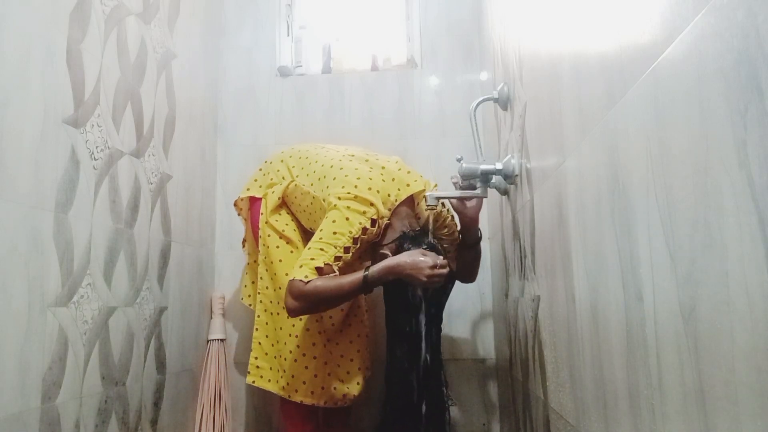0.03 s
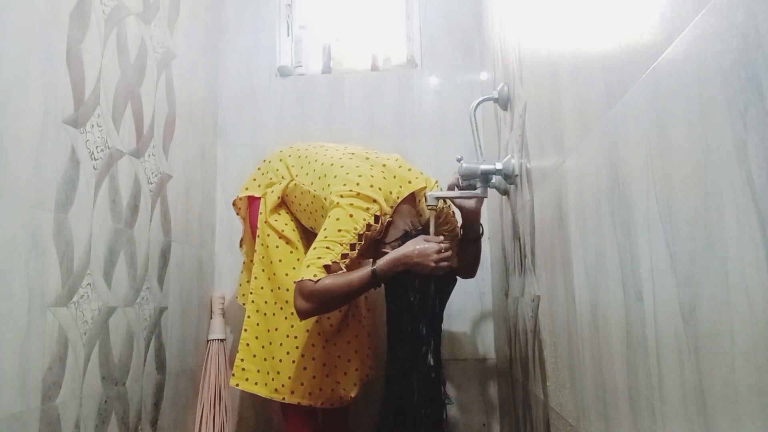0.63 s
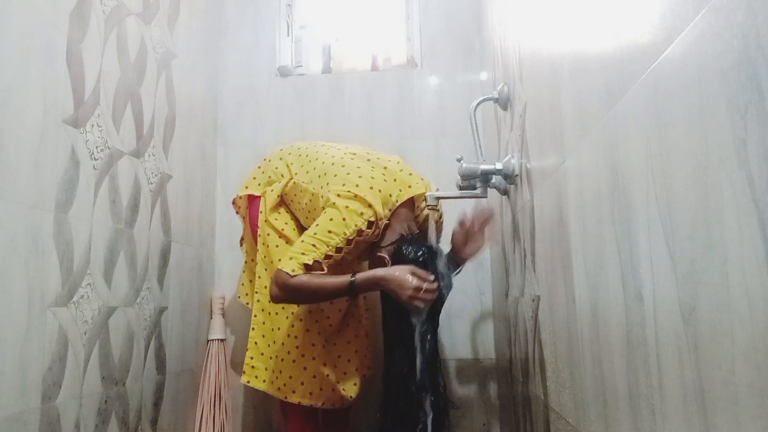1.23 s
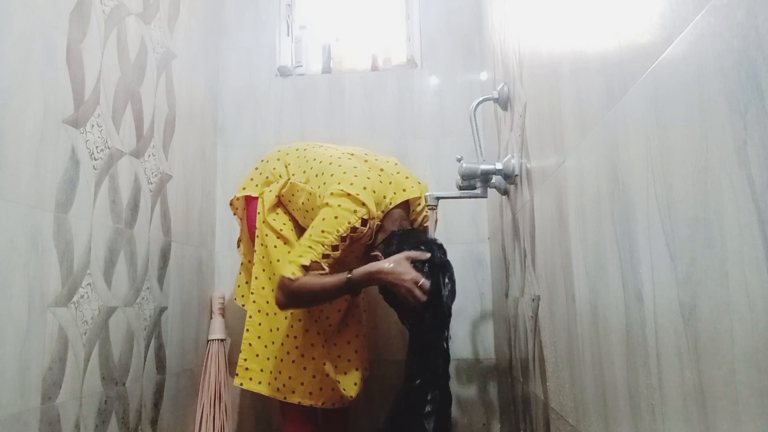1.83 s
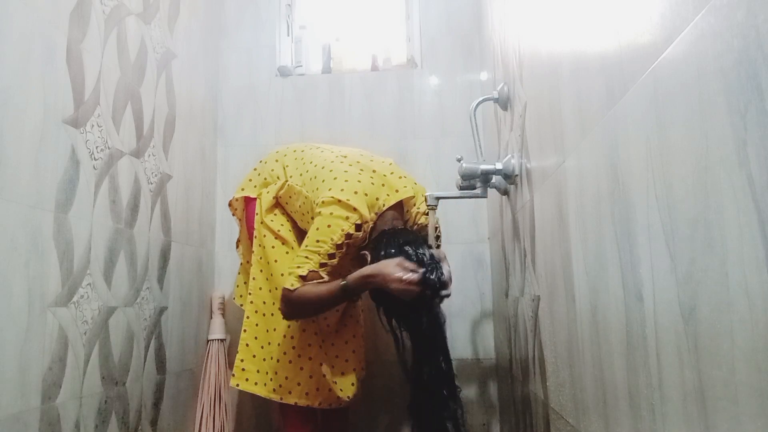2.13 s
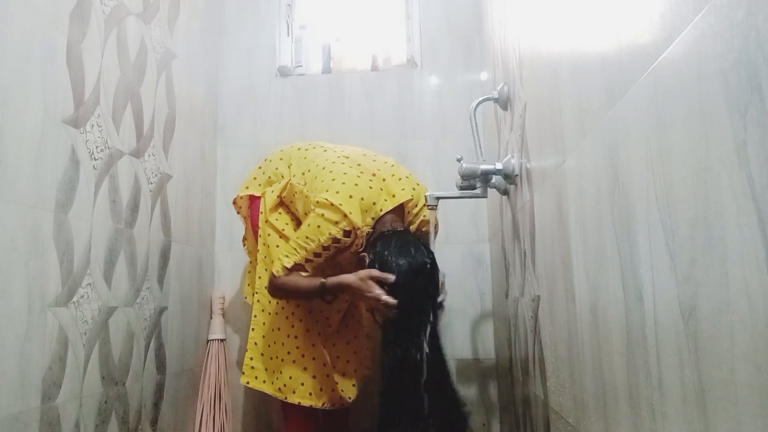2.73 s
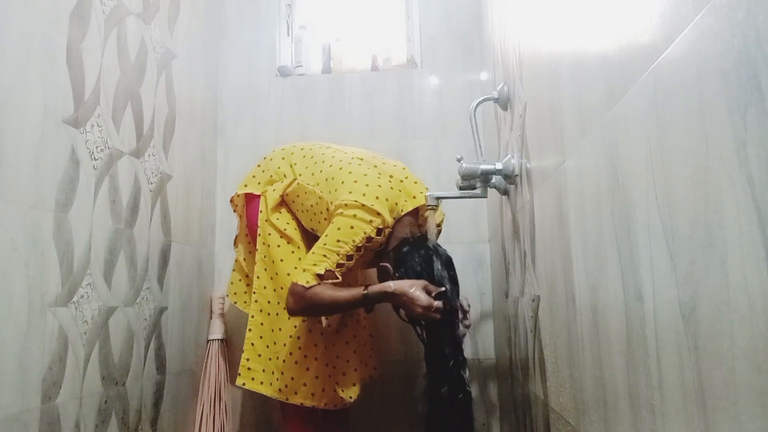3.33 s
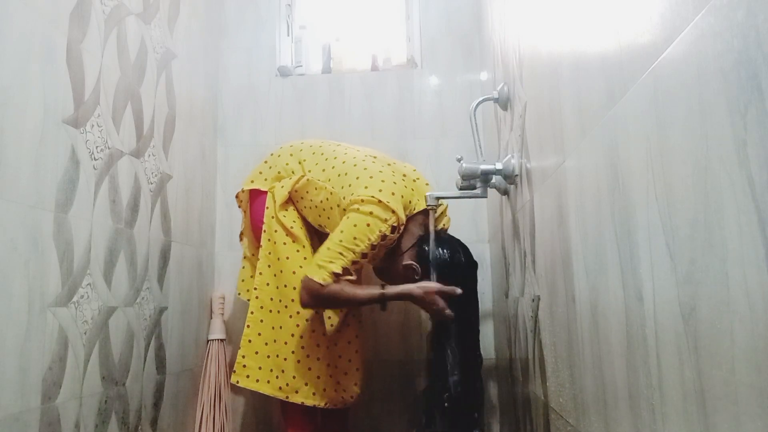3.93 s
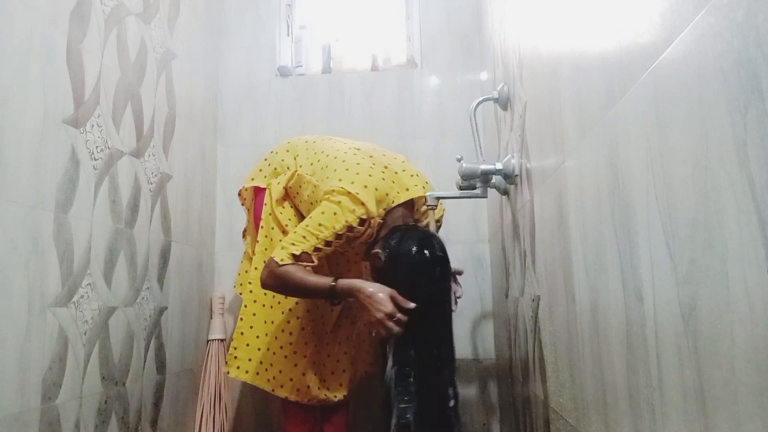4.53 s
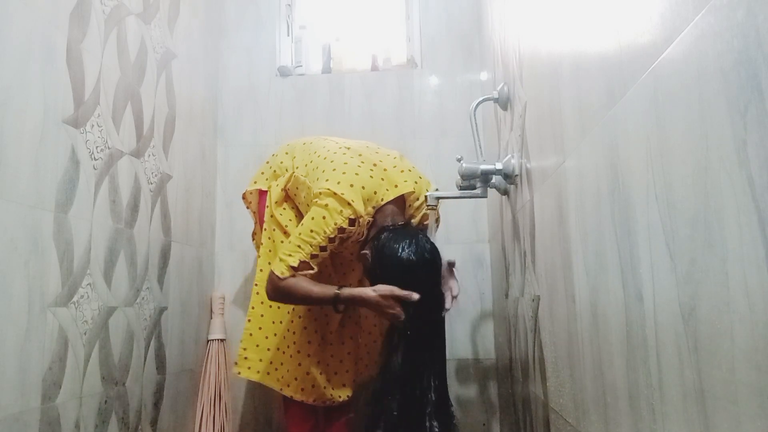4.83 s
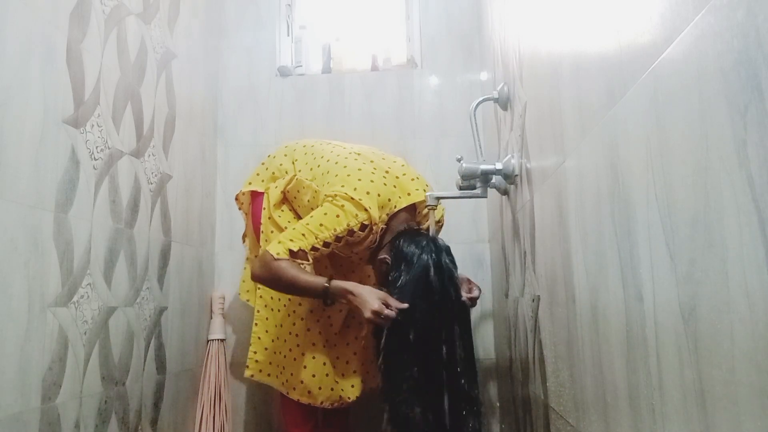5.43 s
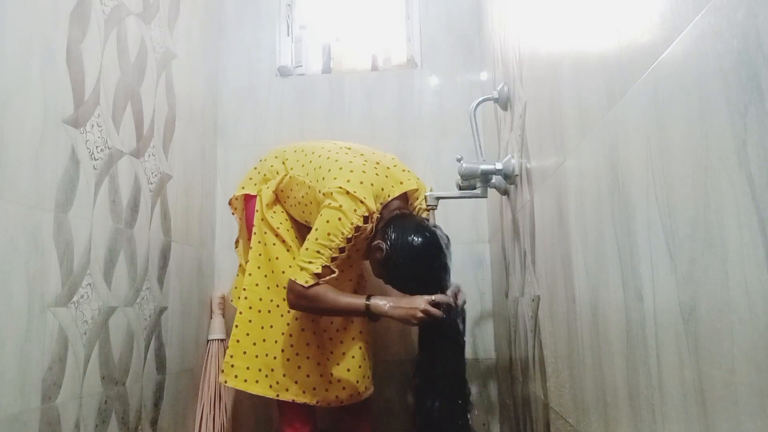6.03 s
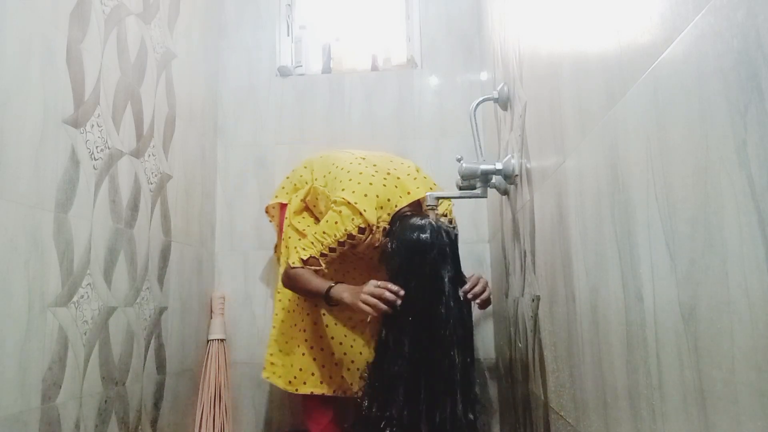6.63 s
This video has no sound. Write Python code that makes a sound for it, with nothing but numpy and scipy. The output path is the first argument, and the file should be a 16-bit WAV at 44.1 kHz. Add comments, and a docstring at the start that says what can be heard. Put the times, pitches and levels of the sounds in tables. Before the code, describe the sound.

Tap water runs through long hair and splatters unevenly onto the floor of a small, echoing tiled bathroom.

```python
"""Tap water runs through long hair onto the floor of a small, echoing tiled bathroom.
Within half a second the stream builds: a gush drums, the puddle churns, hollow tones start ringing.
Then fine spray and heavier drops patter as the hands press out pour after pour; lumps of water slap
down, droplets spit, bubbles plop. The trickle surges near 4.2 s, eases, and swells again toward
the end at 6.7 s, with the hardest slaps."""
import sys
import numpy as np
from scipy import signal
from scipy.fft import rfft, irfft, next_fast_len
from scipy.io import wavfile
from scipy.ndimage import uniform_filter1d, map_coordinates

SR = 44100
rng = np.random.default_rng(int(sys.argv[2]) if len(sys.argv) > 2 else 0)


def unload_wav(signal):
    """Save mono or channel-first audio to the path in sys.argv[1] as 16-bit WAV at rate SR, clipped to [-1, 1]."""
    wavfile.write(
        sys.argv[1],
        SR,
        np.round(np.clip(np.atleast_2d(signal).T, -1, 1) * 32767).astype(np.int16),
    )


N = 295470

# tile reverberation: f/Hz, t60/s
TILE_DECAY = [(200, 0.26), (1300, 0.4), (3500, 0.36), (9000, 0.27), (15000, 0.22)]
# low standing waves of the room: f/Hz, width/Hz, level/dB
STANDING_WAVES = [(181.7, 16, 9), (276, 14.4, 8.5)]
# narrow resonances between the walls: f/Hz
WALL_TONES_HZ = [1045, 1284, 1775, 2124, 2357, 2860, 3153]
# still air: f/Hz, level/dB
AIR_SPECTRUM = [(20, -19), (100, 10.5), (1000, -4.5), (16000, -17)]
# churning of the puddle: t/s, level/dB
GURGLE_LEVEL = [(0.2, -100), (0.45, -65), (0.95, -92), (1.65, -65.5), (2.45, -82.5), (5.6, -85.5),
                (6.7, -78)]
# hollow resonances fed by the stream: f/Hz, nominal width/Hz, level/dB
HOLLOW_MODES = [(607.6, 22.5, 0), (998, 33, -8.5), (1441, 27, -1.5), (1887, 55, -9), (3026, 87, -7)]
# hollow ringing: t/s, level/dB
HOLLOW_LEVEL = [(0.15, -100), (0.26, -70), (0.6, -73.5), (1.5, -59.5), (2.2, -65), (3.1, -65.5), (3.7, -68),
                (5.5, -69), (6.7, -60)]
# second hollow tone, raised while the tap opens: t/s, gain/dB
SECOND_TONE_BOOST = [(0.3, 15), (0.95, 16.5), (1.5, 0.5)]
# drumming on the floor: f/Hz, level/dB
THUD_SPECTRUM = [(30, -54), (60, -34), (120, -9), (160, -13.5), (210, -2.5), (330, -10.5), (420, -6),
                 (520, 1), (750, -7.5), (1100, -2.5), (1800, -69.5)]
# thick gushes: crest t/s, level/dB, rise/(dB/s)
GUSH_CRESTS = [(0.498, -50.5, 212), (1.171, -60.5, 600), (1.65, -62.5, 78), (3.34, -76, 170),
               (6.071, -61.5, 902), (6.411, -67, 169.5)]
# large bubbles in the puddle: t/s, level/dB, f/Hz
PLOP_EVENTS = [(0.01, -55, 1106), (0.214, -62, 2534), (0.711, -52.5, 1172), (1.066, -52, 984),
               (1.169, -55.5, 312), (1.643, -49, 1255), (2.043, -49, 1235), (3.214, -53, 1234),
               (4.011, -53.5, 1127), (4.133, -50, 1230), (4.685, -62, 1270), (6.065, -56.5, 358),
               (6.072, -51.5, 572), (6.295, -47, 1184)]
# droplets bursting on the tiles: t/s, level/dB, f/Hz
SPIT_EVENTS = [(0.1014, -61.5, 7940), (0.4516, -53, 11100), (1.277, -48.5, 12800), (1.517, -53, 7810),
               (1.6452, -42.5, 6360), (1.68, -40.5, 10500), (1.759, -41, 7500), (1.877, -36, 10400),
               (1.8877, -37, 10100), (2.1188, -41.5, 7240), (3.1588, -49, 9500), (3.1965, -48, 12400),
               (3.3326, -54, 10700), (3.6243, -52, 10400), (3.6714, -44.5, 6940), (3.8692, -36.5, 11600),
               (4.165, -38, 10200), (4.357, -43.5, 10700), (4.463, -49.5, 10400), (4.636, -49, 8300),
               (5.183, -42.5, 6250), (5.578, -46, 8900), (5.701, -39.5, 6540), (6.04, -39.5, 7300),
               (6.4765, -43, 7850), (6.54, -35, 9660), (6.631, -40, 8100)]
# lumps of water landing: t/s, level/dB, f/Hz, width/oct
SLAP_EVENTS = [(0.3036, -52.5, 2380, 0.38), (0.4615, -40.5, 1760, 0.28), (0.4778, -39, 1940, 0.28),
               (0.4985, -38, 2030, 0.28), (0.61, -48.5, 2810, 0.3), (0.712, -46.5, 1900, 0.37),
               (0.852, -45, 2100, 0.42), (1.152, -41.5, 1250, 0.67), (1.1639, -35.5, 1820, 0.3),
               (1.427, -41.5, 2900, 0.87), (1.7695, -36.5, 2240, 0.46), (2.1173, -44.5, 2930, 0.6),
               (2.3995, -45.5, 2630, 0.54), (2.765, -51, 1650, 0.48), (3.1584, -47, 3800, 0.6),
               (3.3214, -47.5, 2480, 0.17), (3.8651, -42, 2980, 0.21), (3.887, -41.5, 3320, 0.8),
               (3.9445, -44, 2860, 0.17), (3.9686, -34.5, 3370, 0.74), (4.1415, -41.5, 1560, 0.7),
               (4.4628, -47.5, 2750, 0.23), (4.8628, -49, 3000, 0.18), (5.0394, -46.5, 1790, 0.57),
               (5.1846, -48, 3320, 0.7), (5.6835, -51, 3300, 0.5), (5.7, -43.5, 2880, 0.98),
               (5.937, -29.5, 1820, 0.29), (5.947, -39, 3310, 0.36), (6.289, -42.5, 2230, 0.66),
               (6.3314, -36, 2050, 0.68), (6.4737, -30, 3140, 0.34), (6.6467, -31.5, 2610, 0.79)]
# colour of the lumps: f/Hz, level/dB
SLAP_SPECTRUM = [(500, 5.0), (1300, -18.5), (4100, -12.5), (4800, -24.0), (7000, 0.5), (15000, -51)]
# fine spray: f/Hz, level/dB
SPRAY_SPECTRUM = [(2760, -28), (4700, -20.5), (4870, -31), (5120, -15.5), (5640, -10.5), (6740, -3.5),
                  (7770, -2.5), (9230, -11), (9860, -4), (10300, 2), (11500, -5), (12800, -2),
                  (14000, -12.5), (15000, -6.5)]
# heavy drops: f/Hz, level/dB
DROP_SPECTRUM = [(380, -30), (650, -2), (817, -2.5), (984, -4), (1360, -4.5), (3000, -4), (3900, 1.5),
                 (4900, -24), (6370, -76)]
# trickle off the hair: t/s, spray level/dB, drop level/dB
TRICKLE_LEVELS = [(0.0, -81.5, -71.5), (0.25, -79.5, -81), (0.42, -64.5, -60), (1.15, -66, -63),
                  (2.38, -68, -65), (2.7, -66, -64.5), (3.3, -62.5, -62.5), (3.75, -60.5, -73.5),
                  (4.2, -50.5, -53), (4.42, -64.5, -78), (5.0, -57, -72), (5.55, -58.5, -74),
                  (5.85, -53.5, -62.5), (6.7, -48, -50.5)]
# one pour per hand stroke: t/s, length/s, spray level/dB, drop level/dB, drop f/Hz
HAND_POURS = [(0.394, 0.15, -59.5, -51, 1640), (0.85, 0.17, -57.5, -53, 2420),
              (1.183, 0.065, -57.5, -56, 1380), (1.41, 0.19, -55.5, -54.5, 1920),
              (1.616, 0.17, -46.5, -49, 1860), (1.862, 0.035, -47, -51, 2600),
              (2.074, 0.15, -56.5, -56, 1740), (2.398, 0.12, -61.5, -56.5, 1860),
              (2.8, 0.13, -54.5, -53, 1430), (3.176, 0.16, -58.5, -63.5, 2800),
              (3.862, 0.12, -48, -53.5, 2320), (4.066, 0.23, -61, -55, 1660),
              (4.47, 0.076, -59.5, -57.5, 2520), (4.69, 0.13, -57, -63.5, 1800),
              (4.814, 0.17, -65, -58, 2080), (5.185, 0.13, -65, -62.5, 2400),
              (5.676, 0.11, -51.5, -55, 2930), (5.958, 0.16, -51.5, -57.5, 2440),
              (6.268, 0.091, -50.5, -47.5, 2060), (6.487, 0.32, -48, -47, 2220)]


def amp(db):
    """Decibels to gain."""
    return np.exp(np.asarray(db) * (np.log(10) / 20))


def unit(x):
    """Scale to rms 1."""
    return x / np.sqrt(np.mean(x ** 2) + 1e-20)


def along(points, hz):
    """Interpolate (f/Hz, value) points on a log axis."""
    f, v = np.transpose(points)
    return np.interp(np.log(hz + 1), np.log(f + 1), v)


def curves(rows):
    """One value per sample for each column after the time."""
    times, *columns = np.transpose(rows)
    return [np.interp(np.arange(N) / SR, times, column) for column in columns]


def wobble(rate_hz):
    """Smooth random curve, knots at rate_hz."""
    knots = rng.standard_normal(int(N * rate_hz / SR) + 4)
    return map_coordinates(knots, [np.arange(N) * rate_hz / SR])


def hump(hz, pitch_hz, width_oct):
    """Gain of a broad peak around a pitch."""
    return 1 / (1 + (np.log2((hz + 1) / pitch_hz) / width_oct) ** 2)


def resonances(modes, hz):
    """Gain of a set of modes: f/Hz, width/Hz, level/dB."""
    return np.sqrt(sum((amp(db) * width * hz) ** 2 / ((f * f - hz * hz) ** 2 + (width * hz) ** 2)
                       for f, width, db in modes))


def filtered(x, gain):
    """Minimum-phase filter with magnitude gain(hz)."""
    m = 2 * next_fast_len(len(x) // 2 + 4096)
    cepstrum = irfft(np.log(np.maximum(gain(np.fft.rfftfreq(m, 1 / SR)), 1e-6)), m)
    cepstrum[1:m // 2] *= 2
    cepstrum[m // 2 + 1:] = 0
    return irfft(rfft(x, m) * np.exp(rfft(cepstrum)), m)[:len(x)]


def add(track, start_s, sound):
    """Mix a sound into the track."""
    part = track[max(round(start_s * SR), 0):][:len(sound)]
    part += sound[:len(part)]


def impacts(samples, rate_hz, spread_db):
    """Randomly timed impulses of unequal size."""
    hit = rng.random(samples) < rate_hz / SR
    size = amp(spread_db * np.minimum(rng.exponential(size=samples), 4))
    return hit * size * np.sign(rng.standard_normal(samples))


def bubbles(count, pitch_hz, spread_oct, decay_cycles, spread_db, samples=441):
    """Scattered bubbles, each ringing briefly with rising pitch."""
    t = np.arange(samples) / SR
    start, strength = rng.random((count, 2)).T
    hz = np.minimum(pitch_hz * 2 ** (spread_oct * rng.standard_normal((count, 1))), SR / 3)
    age = hz * t / decay_cycles
    envelope = np.sqrt(hz) * np.exp(-age)  # equal energy at any pitch
    rings = envelope * np.sin(2 * np.pi * hz * t * (1 + 0.017 * age))
    gain = amp(spread_db * np.minimum(-np.log(strength), 3))
    where = (start * N).astype(int)[:, None] + np.arange(samples)
    return unit(np.bincount(where.ravel(), (gain[:, None] * rings).ravel(), N)[:N])


def bathroom(x, wet_db, early_db):
    """Direct sound, eight wall echoes and a diffuse tail, new on each call."""
    hz, t, noise = signal.stft(rng.standard_normal(SR // 2), SR, nperseg=256)
    tail = signal.istft(noise * amp(-60 * t / along(TILE_DECAY, hz)[:, None]), SR, nperseg=256)[1]
    response = amp(wet_db) * tail / np.linalg.norm(tail)
    delay_s = rng.uniform(.002, 0.02, size=8)
    response[(delay_s * SR).astype(int)] += amp(early_db) * rng.uniform(-0.83, 1, size=8)
    response[0] += 1
    return signal.fftconvolve(x, response)[:len(x)]


def spots(source, wet_db, count):
    """Water lands at several places, each with its own echoes."""
    return sum(bathroom(source(), wet_db, early_db=-1.5) for _ in range(count))


def still_air():
    """Faint, mostly low room noise."""
    return amp(-88.0) * unit(filtered(rng.standard_normal(N), lambda hz: amp(along(AIR_SPECTRUM, hz))))


def gurgle():
    """The stream churns the puddle; big soft bubbles wake the standing waves."""
    level_db, = curves(GURGLE_LEVEL)
    churn = bubbles(500, pitch_hz=475, spread_oct=0.751, decay_cycles=5.8, spread_db=4.5, samples=4000)
    wet = bathroom(churn, wet_db=5.5, early_db=0.0)
    return amp(level_db) * unit(filtered(wet, lambda hz: 1 + resonances(STANDING_WAVES, hz)))


def hollow_tones(wander_db=2.0, waver=0.012):
    """Drops keep hollow tones ringing, each drifting in level and pitch."""
    level_db, = curves(HOLLOW_LEVEL)
    tones = []
    for pitch_hz, width_hz, db in HOLLOW_MODES:
        hits = impacts(N, rate_hz=500, spread_db=3.0)
        ring = filtered(hits, lambda hz: resonances([(pitch_hz, width_hz, 0)], hz) ** 1.28)
        ring = map_coordinates(ring, [np.cumsum(1 + waver * wobble(24))], mode="mirror")
        tones.append(amp(db + wander_db * wobble(6.3)) * unit(ring))
    rms = np.std(sum(tones))
    tones[1] *= amp(curves(SECOND_TONE_BOOST)[0])
    return amp(level_db) * sum(tones) / rms


def gush_level_db(drops_db):
    """Light drumming follows the heavy drops; each gush crests and drains."""
    t = np.arange(N) / SR
    power = amp(-89.5 + drops_db - drops_db.mean()) ** 2
    for crest_s, db, rise_db_per_s in GUSH_CRESTS:
        drain_db_per_s = min(125, rise_db_per_s / 2)  # slow gushes ebb slowly
        below_db = np.maximum(rise_db_per_s * (crest_s - t), drain_db_per_s * (t - crest_s))
        power += amp(db - below_db) ** 2
    return 10 * np.log10(power)


def gushes(level_db):
    """Thick ropes of water drum on the floor and wake the standing waves."""
    blows = bathroom(impacts(N, rate_hz=300, spread_db=1.0), wet_db=4.5, early_db=-3.5)
    colour = lambda hz: amp(along(THUD_SPECTRUM, hz)) * (1 + resonances(STANDING_WAVES, hz))
    return amp(level_db + 1.0) * unit(filtered(blows, colour))


def plops(rise=0.12, attack_s=0.014, decay_s=0.0093, trim_db=-1):
    """A large bubble swells, rises in pitch and dies; two smaller ones follow."""
    gap_s, loss_db, pitch_step = 0.055, 5.5, 0.025  # per follower
    out, t = np.zeros(N), np.arange(SR // 2) / SR
    decay = np.exp(-t / decay_s)
    envelope = (1 - np.exp(-t / attack_s)) * decay
    for start_s, db, pitch_hz in PLOP_EVENTS:
        for k in range(3):
            glide_hz = pitch_hz * (1 + k * pitch_step + rise * (.3 - decay))
            note = envelope * np.sin(2 * np.pi * np.cumsum(glide_hz) / SR)
            wet = bathroom(note, wet_db=4.5, early_db=1.0)
            peak = amp(db + trim_db - k * loss_db) * np.sqrt(2)
            add(out, start_s + k * gap_s, peak * wet / np.abs(wet).max())
    return out


def splashes(rows, spectrum, t30_s, scatter, wet_db, trim_db):
    """A first blow and a dying cluster of fragments; four trapped bubbles ring near its pitch."""
    out, t = np.zeros(N), np.arange(SR // 3) / SR
    bubble_width_hz, bubble_db = 80, -4.0
    for start_s, db, pitch_hz, width_oct in rows:
        fragments = impacts(len(t), rate_hz=2500, spread_db=2.0) * amp(-30 * t / t30_s)
        burst = scatter * fragments / (np.linalg.norm(fragments) + 1e-9)
        burst[0] += 1
        trapped = [(pitch_hz * 2 ** (width_oct * offset), bubble_width_hz, bubble_db)
                   for offset in rng.uniform(-0.994, 1, size=4)]

        def colour(hz):
            band = hump(hz, pitch_hz, np.sqrt(2) * width_oct) ** 2
            low_cut = 1 / np.sqrt(1 + (pitch_hz * 2 ** (-1.7 * width_oct) / (hz + 1)) ** 12)
            return amp(along(spectrum, hz)) * band * low_cut * (1 + resonances(trapped, hz))

        wet = bathroom(filtered(burst, colour), wet_db, early_db=-13.0)
        peak_rms = np.sqrt(uniform_filter1d(wet ** 2, size=440).max())
        add(out, start_s, amp(db + trim_db) * wet / peak_rms)
    return out


def spits():
    """Droplets burst on the tiles; finer ones cover a wider band."""
    rows = [(start_s, db, hz, 0.43 * (hz / 7000) ** 2) for start_s, db, hz in SPIT_EVENTS]
    return splashes(rows, SPRAY_SPECTRUM, t30_s=0.0056, scatter=1.16, wet_db=5.5, trim_db=-1.5)


def slaps():
    """Squeezed-out lumps of water hit the floor."""
    return splashes(SLAP_EVENTS, SLAP_SPECTRUM, t30_s=0.011, scatter=1.36, wet_db=3.5, trim_db=-5.5)


def pour_shape(t, start_s, length_s, attack_s=0.023, swell_db=5, drain_db_per_s=105):
    """Gain of a pour that opens, swells while pressed and drains."""
    age_s = t - start_s
    opening = np.clip(age_s / attack_s, 0, 1)
    pressed_db = swell_db * (np.clip(age_s / length_s, 0, 1) - .5)
    return opening * amp(pressed_db - drain_db_per_s * np.maximum(age_s - length_s, 0))


def flow_db():
    """Levels of spray and drops: trickle plus pours."""
    t = np.arange(N) / SR
    power = amp(curves(TRICKLE_LEVELS)) ** 2
    for start_s, length_s, spray_db, drops_db, _ in HAND_POURS:
        power += (amp([[spray_db], [drops_db]]) * pour_shape(t, start_s, length_s)) ** 2
    return 10 * np.log10(power)


def spray(level_db):
    """Fine droplets tick on the wet floor in flurries and leave a fizz of tiny bubbles."""
    def droplets():
        flurries = amp(1.8 * wobble(30))
        ticks = unit(impacts(N, rate_hz=95, spread_db=3.7))
        fizz = bubbles(1200, pitch_hz=9160, spread_oct=0.425, decay_cycles=8.3, spread_db=3.0)
        return flurries * (ticks + 0.18 * fizz)

    wet = spots(droplets, wet_db=4.5, count=3)
    return amp(level_db - 0.02) * unit(filtered(wet, lambda hz: amp(along(SPRAY_SPECTRUM, hz))))


def drop_gain(hz, t, trickle_hz=1690, width_oct=1.36, sag_oct_per_s=2.7):
    """The trickle holds one pitch; each pour sinks as the puddle deepens."""
    times, _, trickle_db = np.transpose(TRICKLE_LEVELS)
    power = (amp(np.interp(t, times, trickle_db)) * hump(hz, trickle_hz, width_oct)) ** 2
    for start_s, length_s, _, db, pitch_hz in HAND_POURS:
        sag_oct = sag_oct_per_s * np.clip(t - start_s - length_s / 2, -length_s, length_s)
        band = hump(hz, pitch_hz / 2 ** sag_oct, width_oct)
        power += (amp(db) * pour_shape(t, start_s, length_s) * band) ** 2
    return np.sqrt(power)


def patter(patch_db=3.0, tone_width_hz=9.8):
    """Heavy drops from the hair ends strike the puddle in spurts, trap bubbles and wake the room."""
    def drops():
        spurts = amp(0.85 * wobble(25))
        hits = unit(impacts(N, rate_hz=200, spread_db=4.5))
        trapped = bubbles(1300, pitch_hz=2009, spread_oct=0.601, decay_cycles=8.6, spread_db=3.0,
                          samples=900)
        return spurts * (hits + 0.89 * trapped)

    wall_modes = [(hz, tone_width_hz, 0) for hz in WALL_TONES_HZ]
    colour = lambda hz: amp(along(DROP_SPECTRUM, hz)) * (1 + resonances(wall_modes, hz))
    wet = unit(filtered(spots(drops, wet_db=5.0, count=2), colour))
    hz, t, spectra = signal.stft(wet, SR, nperseg=1024)
    # pockets in the hair shift the colour in patches
    patches = uniform_filter1d(rng.standard_normal(spectra.shape), size=7, axis=0)
    patches = unit(uniform_filter1d(patches, size=7, axis=1))
    spectra *= drop_gain(hz[:, None], t) * amp(patch_db * patches - 2.0)
    return signal.istft(spectra, nperseg=1024)[1][:N]


def scene():
    """Falling water over still air, mono."""
    spray_db, drops_db = flow_db()
    splashing = slaps() + spits()
    air = still_air()
    stream = spray(spray_db) + patter() + gushes(gush_level_db(drops_db))
    ringing = hollow_tones()
    puddle = gurgle() + plops()
    return (air + ringing + puddle + splashing + stream)[None]


def record(dry, top_hz=15600):
    """Brick-wall low-pass."""
    m = next_fast_len(N + SR // 2)
    return irfft(rfft(dry, m) * (np.fft.rfftfreq(m, 1 / SR) < top_hz), m)[..., :N]


dry = scene()
out = record(dry)
unload_wav(out)
```